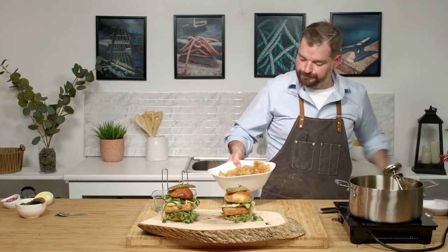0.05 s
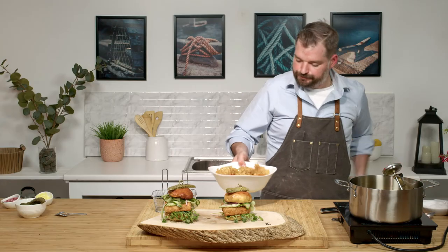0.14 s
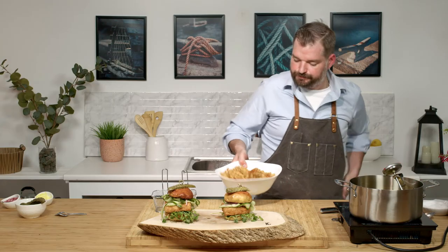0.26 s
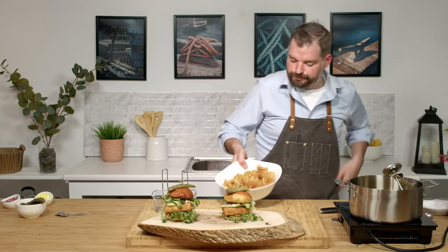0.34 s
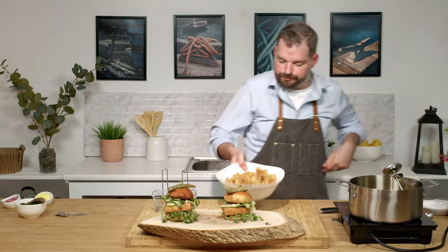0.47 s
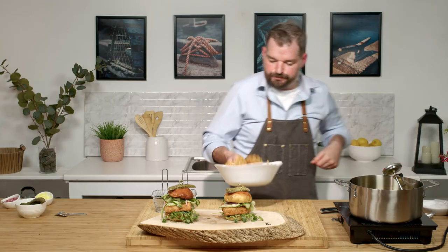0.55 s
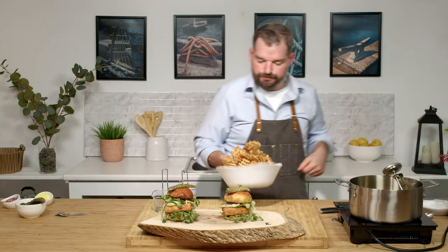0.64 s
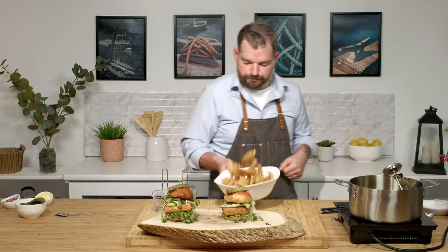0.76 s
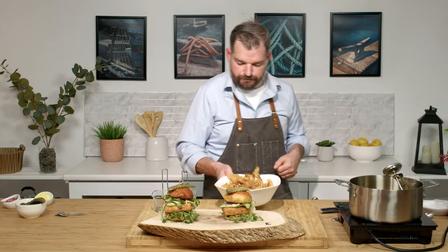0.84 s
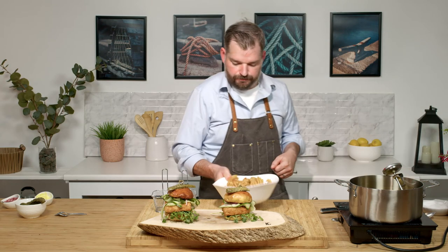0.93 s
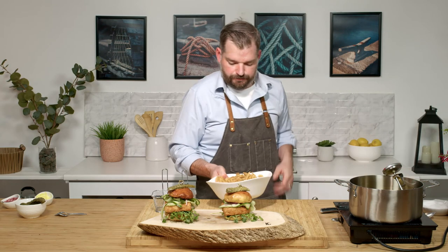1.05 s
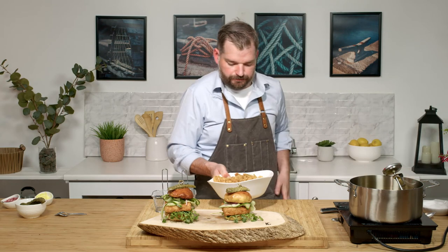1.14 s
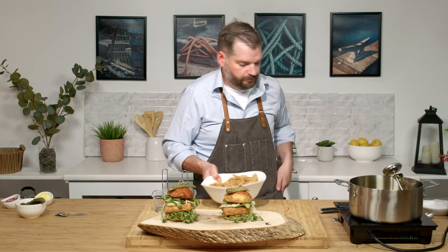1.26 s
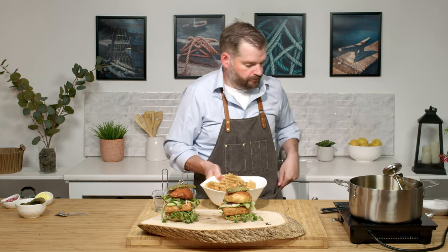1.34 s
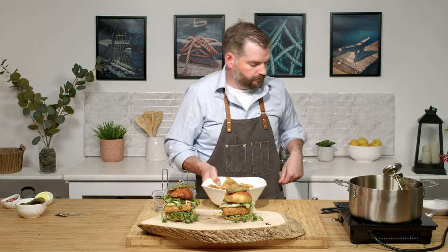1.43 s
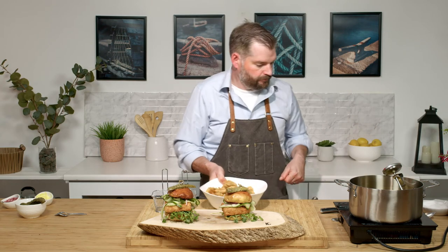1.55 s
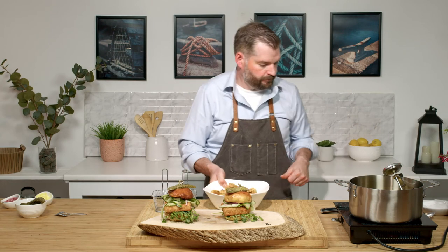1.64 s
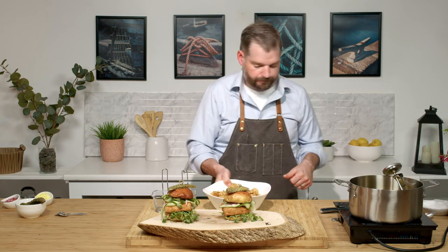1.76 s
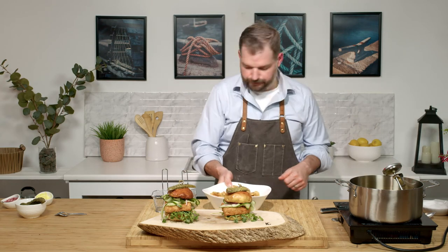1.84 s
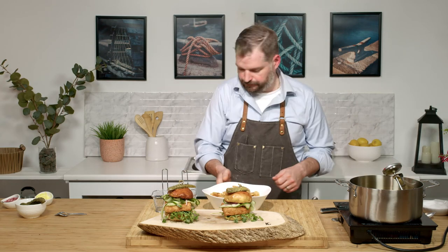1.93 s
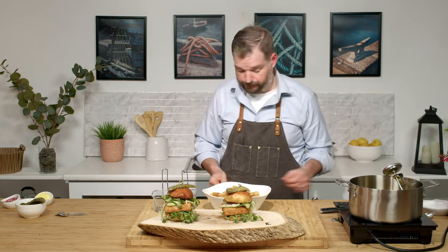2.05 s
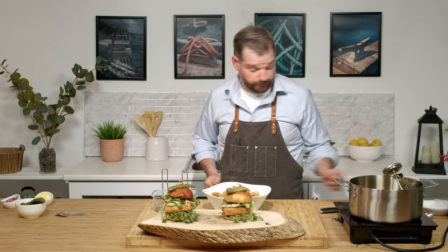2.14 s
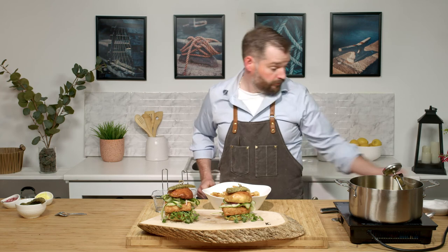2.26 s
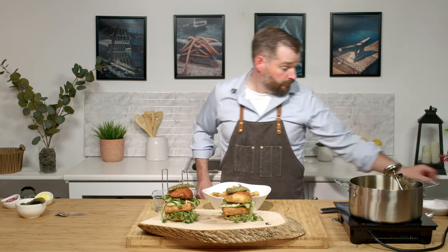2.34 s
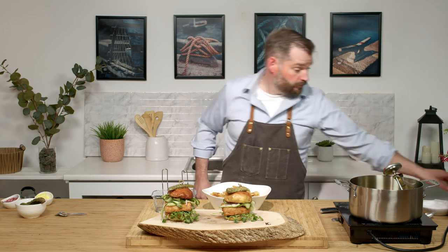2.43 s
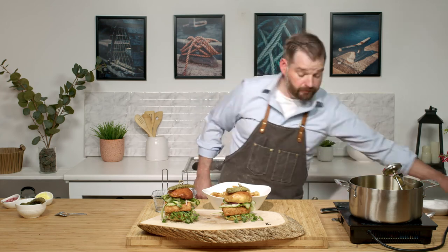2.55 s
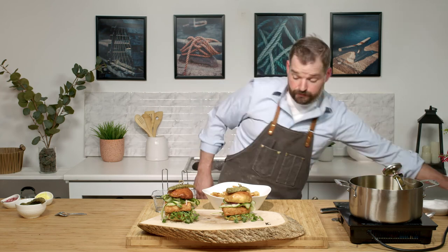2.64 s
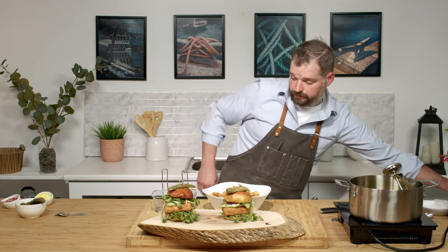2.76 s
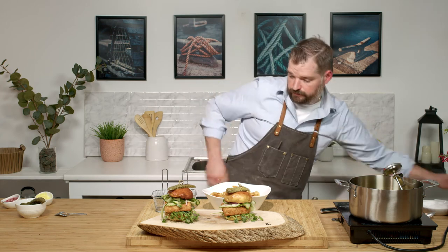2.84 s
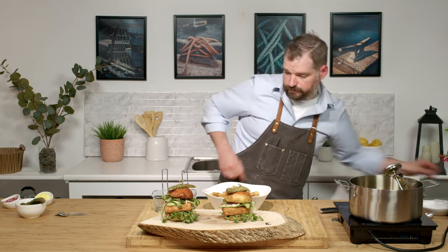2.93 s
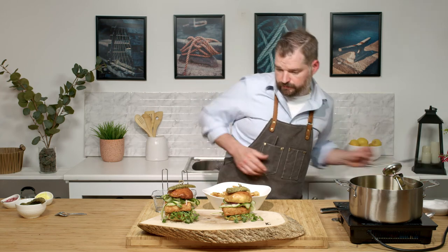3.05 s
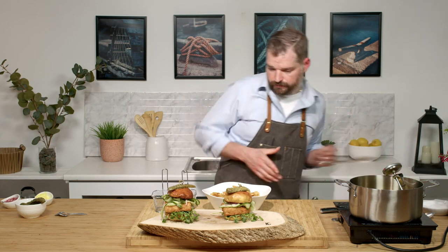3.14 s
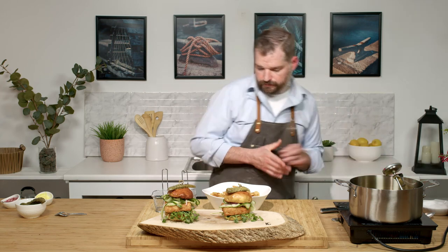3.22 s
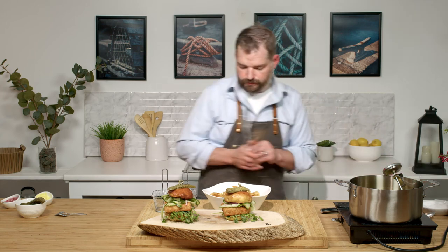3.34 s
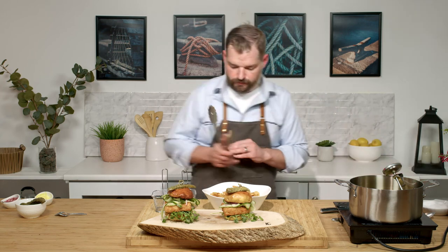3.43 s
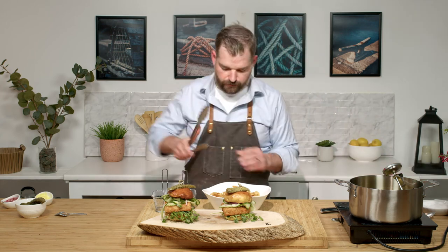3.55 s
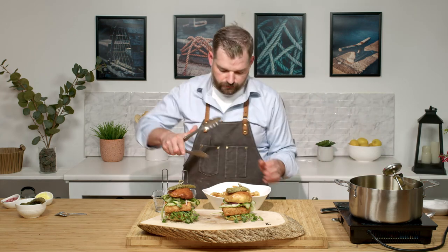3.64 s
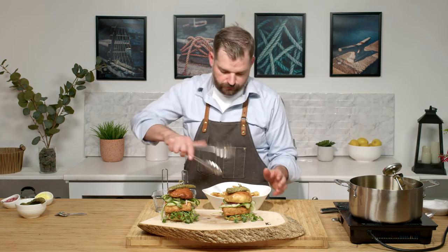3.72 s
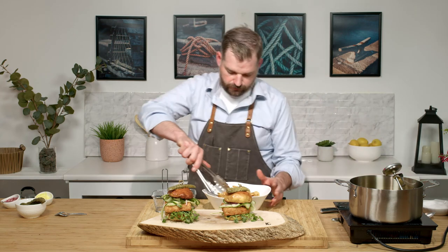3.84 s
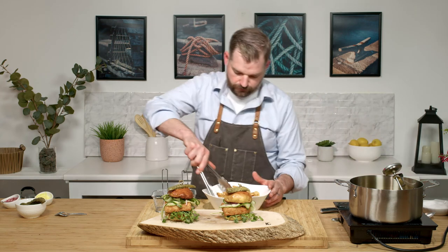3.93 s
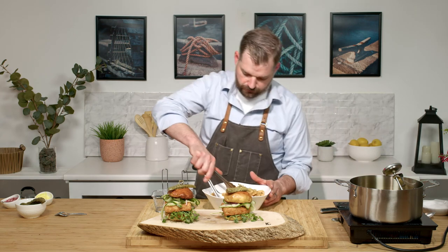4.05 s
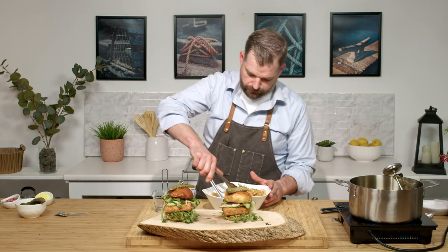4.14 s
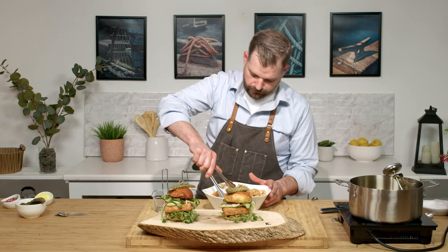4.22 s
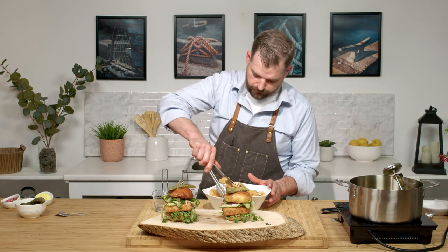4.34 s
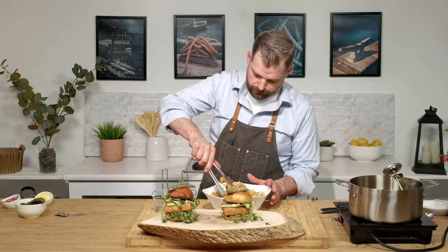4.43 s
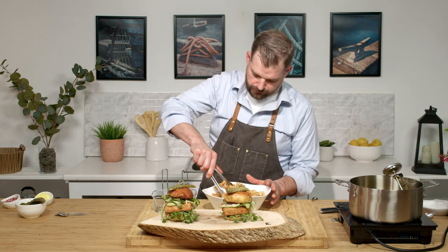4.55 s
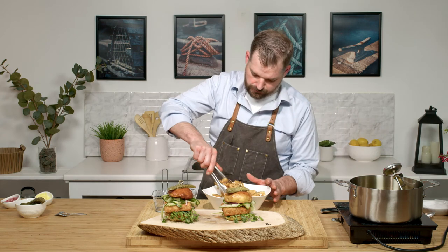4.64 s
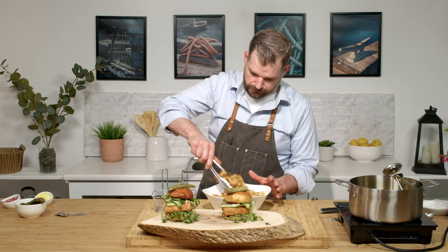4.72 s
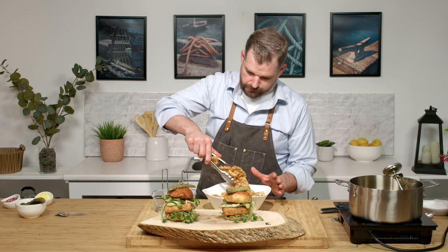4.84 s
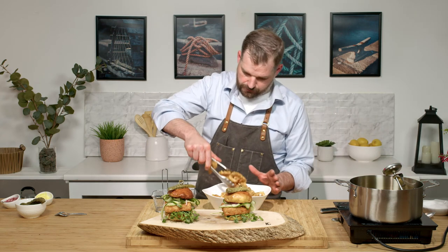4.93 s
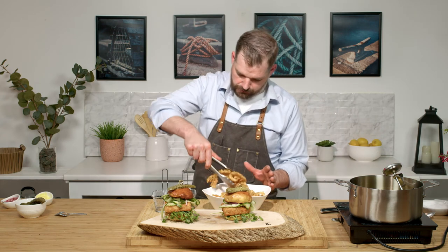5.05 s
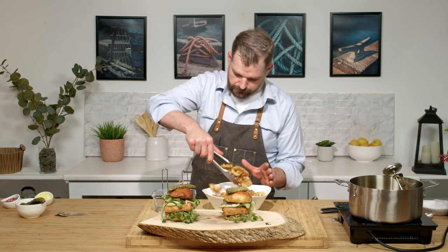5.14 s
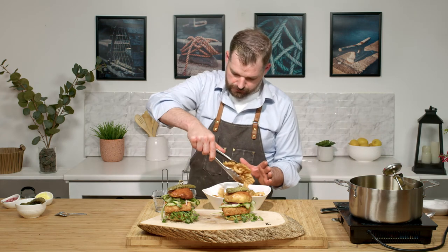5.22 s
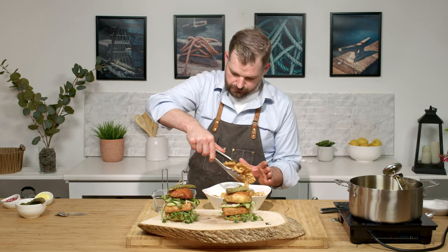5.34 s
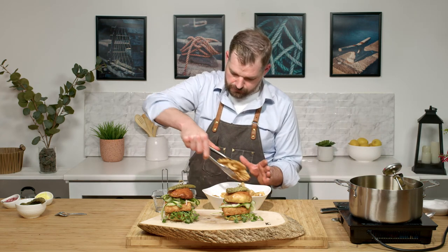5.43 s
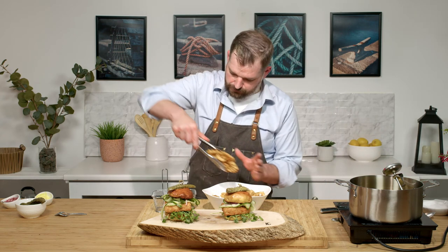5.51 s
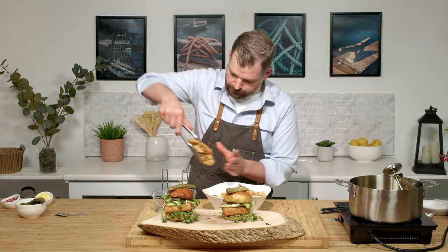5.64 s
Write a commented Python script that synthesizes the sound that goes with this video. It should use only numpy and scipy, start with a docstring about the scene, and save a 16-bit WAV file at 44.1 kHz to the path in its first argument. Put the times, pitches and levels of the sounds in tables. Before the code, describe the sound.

Near microphone in a small, lightly reverberant kitchen with faint room tone: shirt and apron rustle, a bowl is tapped, fries jump and land with small crunchy clicks. Around two seconds the bowl knocks loudly on wood. Metal tongs jingle as they are picked up, strike the bowl with a bright ringing clash, then scrape and tick, ending with a rim ping and quiet.

```python
"""In a quiet kitchen, with room tone that sinks slowly, a cook taps a ceramic bowl and tosses fries in it.
He sets the bowl on a wooden board, where it clatters to rest, then drags steel tongs off the counter.
The tongs clash on the bowl, scrape among the fries with small ticks, and leave a last ping on the rim.
His clothes rustle near the microphone throughout, dry, while bowl, board and tongs also wake the room.
Hard objects ring as damped modes; fries, scrapes and cloth are random tiny contacts, shaped in colour."""
import sys
import numpy as np
from scipy import signal
from scipy.fft import rfft, irfft, next_fast_len
from scipy.io import wavfile
from scipy.ndimage import map_coordinates

SR = 44100
rng = np.random.default_rng(int(sys.argv[2]) if len(sys.argv) > 2 else 0)


def to_wav(sig):
    """Store sig (one row per channel, or 1-D mono) as 16-bit WAV at the path in sys.argv[1].

    Samples outside -1..1 are clipped; the rate is SR.
    """
    pcm = np.clip(np.atleast_2d(sig), -1, 1) * 32767
    pcm = np.round(pcm).astype(np.int16)
    wavfile.write(sys.argv[1], SR, pcm.T)  # frames by channels


N = 250488
TIME = np.arange(N) / SR  # seconds through the scene
AGE = np.arange(SR // 2) / SR  # seconds since one blow

# In every table level_db is a setting ahead of the mix. A gesture is full from full_s for hold_s;
# its rise_s and fall_s are the times for a tenfold change.

# Room tone, spectrum: pitch_hz, level_db
ROOM_TONE = [(12, -50.5), (20, 7.5), (141, 0.5), (240, -0.5), (308, -0.5), (554, -2), (733, -5.5),
             (1510, -10.5), (1840, -11), (2300, -15), (3130, -22), (4140, -19.5), (15800, -32)]
AIR_DB, AIR_DB_PER_S = -66.5, -0.41  # level at the start, and its slow sinking
# Decay of the room's answer: pitch_hz, t60_s
KITCHEN_DECAY = [(150, 0.17), (700, 0.34), (3000, 0.59), (12000, 0.15)]
TOP_HZ = 15750  # band limit of the scene

# Hiss of sliding shirt and tumbling fries, spectrum: pitch_hz, level_db
SWISH_COLOUR = [(500, -6), (1000, -9), (1500, -6.5), (4000, -10.5), (10000, -14.5), (14000, -20),
                (15800, -33)]
# Low rustle of the crumpling apron, spectrum: pitch_hz, level_db
APRON_COLOUR = [(20, -17), (45, 3), (110, 2), (220, -3), (550, -9), (1500, -19), (2600, -18.5), (5400, -41),
                (10000, -55)]
# Arm movements: full_s, hold_s, shirt_db, apron_db
ARM_MOVES = [(0.065, 0.15, -61.5, -79), (0.222, 0.08, -96, -60), (0.39, 0.047, -66, -87),
             (0.63, 0.091, -72.5, -73), (0.813, 0.058, -57, -63), (0.983, 0.0091, -67, -58.5),
             (1.188, 0.32, -67, -67), (2.068, 0.064, -64.5, -54), (2.258, 0.08, -73, -64),
             (2.538, 0.045, -63.5, -65), (2.708, 0.039, -64, -55), (2.821, 0.072, -84, -61),
             (3.034, 0.021, -61.5, -55.5), (3.24, 0.11, -74.5, -62.5), (3.583, 0.059, -71, -65),
             (4.124, 0.26, -73.5, -73.5)]
MOVE_RISE_S, MOVE_FALL_S = 0.041, 0.044  # every movement starts and dies away alike
STIR_SHIRT_DB, STIR_APRON_DB, STIR_SWING_DB = -71, -75.5, 1.5  # the cloth is never quite still

# Soft bumps of hands, bowl and board, some under the tongs' blows: start_s, level_db, pitch_hz, t60_s
SOFT_BUMPS = [(0.289, -52.5, 635, 0.14), (0.85, -57, 200, 0.11), (0.998, -60, 130, .08),
              (1.215, -55, 50.3, 0.2), (2.113, -54.5, 96, 1), (2.828, -55, 610, 0.4),
              (2.872, -65, 600, 0.18), (3.9023, -43.5, 900, 0.015), (3.901, -45.5, 40, 0.093),
              (4.138, -57, 940, 0.098), (4.429, -51.5, 27.7, 0.17)]

# Modes of the bowl's floor, loaded with fries: pitch_hz, level_db, t60_s
BOWL_FLOOR = [(1847, 3.5, 0.094), (1940, -9.5, 0.032), (2037, -3.5, 0.084), (2900, -9.5, 0.029),
              (3240, 0.5, 0.059), (3445, -7.5, 0.0117), (5330, -12, 0.056), (5650, -3, 0.032),
              (6125, -9, 0.046), (6310, -7, 0.044), (7210, -9, 0.026), (8260, -28, 0.028)]
# Single fries landing, and other small blows that ring the bowl's floor: start_s, level_db, centre_hz
FLOOR_BLOWS = [(0.2454, -48, 3100), (0.392, -49, 4630), (0.433, -50.5, 4540), (0.7426, -43, 1750),
               (0.758, -49, 5500), (0.777, -42.5, 5800), (0.783, -49.5, 2000), (0.801, -46, 5440),
               (0.8172, -34.5, 3300), (0.824, -51.5, 1900), (0.829, -41, 3400), (0.838, -53, 7500),
               (0.856, -56, 2300), (0.925, -59, 3900), (0.981, -56, 3180), (1.215, -62, 1290),
               (1.345, -51, 3350), (1.365, -47, 3400), (1.38, -57.5, 1690), (1.477, -56.5, 5200),
               (1.586, -64, 1410), (1.641, -52, 2570), (1.742, -50.5, 2500), (1.793, -54, 3600),
               (1.936, -45.5, 2920), (4.141, -55, 3300)]
# Shakes and tosses that tumble the fries: full_s, level_db, rise_s, hold_s, fall_s
TOSS_GESTURES = [(0.24, -72.5, 0.059, 0.1, 0.04), (0.385, -64.5, 0.0091, 0.035, 0.04),
                 (0.755, -57.5, 0.029, 0.066, 0.035), (1.35, -75, 0.028, 0.03, 0.049)]
# The bowl being carried: full_s, rise_s, hold_s, fall_s
CARRY_GESTURE = (.6, .1, .95, .35)
SHIFT_DB, SHIFT_SWING_DB = -78, 2  # fries shift while carried: level and unevenness
DROPS_PER_S, DROP_HZ, DROP_DB = 60, 3360, -4.5  # lighter fries on each part of the bowl

# Modes of bowl and board together: pitch_hz, level_db, t60_s
BOWL_ON_BOARD = [(201, -4.5, .35), (258, -5, 0.28), (310, -6.5, 0.17), (386.6, -2.5, 0.23), (511, -5.5, .2),
                 (619, 1.5, 0.17), (692, -2.5, .25), (763, -0.5, 0.21), (858, -7.5, 0.18), (934, -8, 0.3),
                 (1041, -8.5, 0.28), (1156, -8.5, 0.23), (1338, -9.5, 0.091), (1904, -16.5, 0.049)]
# Dull knocks of bowl and board, as the foot lands and once when the tongs strike:
# start_s, level_db, centre_hz
BOARD_KNOCKS = [(1.741, -41.5, 159), (1.791, -36.5, 388), (1.821, -44, 260), (1.846, -39, 332),
                (1.873, -46, 180), (1.899, -36, 370), (1.914, -36, 397), (1.934, -19.5, 700),
                (1.9385, -24.5, 1600), (1.938, -29.5, 218), (1.9425, -15, 640), (1.950, -23.5, 545),
                (1.9595, -29, 480), (1.964, -33, 800), (1.9705, -18.5, 724), (1.987, -38, 555),
                (1.9955, -31, 920), (2.003, -31, 517), (2.0115, -28, 750), (2.0205, -38.5, 1080),
                (2.026, -37, 483), (2.039, -31.5, 900), (2.0485, -39, 750), (2.0615, -39, 750),
                (2.085, -39.5, 900), (2.107, -43, 1000), (2.122, -47.5, 850), (4.139, -49, 1800)]
# Bursts of chatter as its edge touches and as it lands: full_s, board_db, rim_db, rise_s, fall_s
FOOT_LANDINGS = [(1.795, -48.5, -69, 0.021, 0.29), (1.944, -45, -35, 0.033, 0.11)]
# Chatter of the bowl's edge, spectrum: pitch_hz, level_db
EDGE_COLOUR = [(240, -16), (400, -2.5), (462, -31), (502, -11.5), (636, -6), (698, 6), (759, 8), (860, -4),
               (940, -10), (1040, -32), (1170, -14), (1320, -11), (1520, -36), (2200, -30), (4000, -39.5),
               (8000, -66)]
# Thud of the board, spectrum: pitch_hz, level_db
BOARD_COLOUR = [(50, -23), (100, -4.5), (200, 0), (320, 6.5), (380, -25), (460, -11.5), (600, -13),
                (800, -20), (1300, -61)]
KNOCK_SHIFT, LOAD_SHIFT = 0.0205, 0.0086  # moving contact and load detune each blow (share of pitch)
KNOCK_LOW_HZ = 157.4  # the board radiates little below this
KNOCK_T60_S, KNOCK_RING_DB = 0.029, -20.5  # most of a knock stops at once; the rest rings on

# Modes of the tongs lying down: pitch_hz, width_hz, level_db (further weighted by width)
LYING_TONGS = [(2225, 35, -2), (2850, 28, -5), (3150, 35, -8), (3560, 32, -3), (3690, 16, -1),
               (4780, 35, -8), (5020, 28, -3), (5465, 20, 2), (5780, 25, -5), (6525, 22, 0), (8270, 35, -4),
               (8560, 25, -2), (8920, 40, -5), (9210, 25, -3), (10310, 14, 1), (12880, 40, -13),
               (14200, 50, -15)]
# Pulls that slide the tongs off the counter: full_s, level_db, rise_s, hold_s, fall_s
TONG_PULLS = [(2.8, -50.5, 0.016, 0.0053, 0.025), (2.868, -49, 0.019, 0.0044, 0.046)]
# Catches as they slide: start_s, level_db
TONG_CATCHES = [(2.794, -42.5), (2.803, -37.5), (2.812, -45), (2.828, -40.5), (2.837, -47), (2.849, -38),
                (2.856, -42), (2.862, -44), (2.869, -36), (2.874, -35.5), (2.881, -36)]
JINGLE_HZ, JINGLE_T60_S, JINGLE_DB = (2056, 9920), 0.037, -10  # other short partials of each catch
# Clatter of the sliding tongs, spectrum: pitch_hz, level_db
CLATTER_COLOUR = [(1400, -22), (2000, 2.0), (3700, 7.0), (4400, 0.0), (5500, 9), (7300, 4),
                  (9000, 7.5), (15000, -5.5)]

# Strokes of the tips through the fries: full_s, level_db, rise_s, hold_s, fall_s
DIG_STROKES = [(4.07, -67, 0.17, 0.11, 0.037), (4.195, -71.5, .015, .025, 0.06),
               (4.255, -61, 0.0099, 0.011, 0.03), (4.555, -58.5, 0.031, 0.014, 0.055),
               (4.665, -69, 0.027, 0.018, 0.069)]
# Sharp little touches on the bowl, damped by the fries: start_s, level_db, centre_hz
BOWL_TICKS = [(0.476, -51, 3900), (1.720, -44.5, 11500), (3.026, -51, 2800), (3.918, -29.5, 9000),
              (3.995, -40, 7500), (4.030, -46, 8500), (4.066, -44, 10500), (4.087, -41, 6000),
              (4.093, -37, 6140), (4.125, -49, 4500), (4.130, -42, 6950), (4.139, -29, 9600),
              (4.193, -43.5, 4500), (4.211, -50, 5040), (4.252, -45, 6060), (4.265, -52, 6000),
              (4.275, -52, 5000), (4.297, -49, 5700), (4.426, -43, 9750), (4.4312, -33.5, 10100),
              (4.434, -37.5, 7400), (4.556, -56, 7580), (4.572, -35, 6550), (4.569, -34, 9600),
              (4.599, -43, 10600), (4.6554, -36.5, 9200), (4.69, -49, 11500), (4.735, -51, 4500),
              (4.928, -36, 5900), (5.184, -61, 8540), (5.255, -56.5, 5470)]
# Scrape of the tips, spectrum: pitch_hz, level_db
SCRAPE_COLOUR = [(500, 10), (2000, 3.0), (6000, 3.0), (11000, 4.0), (15800, -15.0)]

# Light taps on the rim: start_s, level_db, centre_hz, damping_t60_s
RIM_TAPS = [(0.0715, -4, 1790, 0.058), (0.383, -0.5, 1580, 0.094), (5.0939, -1, 3140, 0.54)]
DAMPING_AT_HZ = 2900  # where that damping holds; higher modes die sooner
# Modes of the bowl's rim: pitch_hz, t60_s, clash_db, tap_db
BOWL_RIM = [(316, .6, -54, -75), (766, .2, -66, -75), (1346, .45, -57, -62), (2063, .42, -56, -71),
            (2887, .4, -52, -49), (3799, .21, -40, -64), (4761, .18, -49, -59), (5660, .07, -56, -54),
            (5735, .09, -55, -49), (6072, .17, -52, -56), (7291, .22, -54, -62), (8450, .12, -52, -61),
            (9803, .2, -60, -69), (11283, .15, -58, -62)]
# Modes of the steel tips: pitch_hz, t60_s, buzz_db on the bowl, free_db ringing
TONG_TIPS = [(3530, .3, -60, -61), (4400, .26, -54, -58), (5590, .19, -53, -52), (6550, .24, -52, -49),
             (6750, .21, -42, -47), (7090, .3, -53, -56), (7730, .18, -52, -51), (8058, .27, -37, -45),
             (8525, .22, -30, -45), (8640, .2, -40, -49), (9208, .19, -50, -47), (9610, .22, -46, -53),
             (9790, .24, -41, -49), (9900, .2, -43, -50), (10250, .2, -38, -52), (10360, .33, -44, -53),
             (11083, .22, -43, -48), (11285, .24, -44, -47), (11760, .24, -50, -53), (12380, .28, -45, -57),
             (12640, .2, -53, -55), (12900, .2, -45, -54), (14230, .24, -56, -57), (14550, .25, -48, -61)]
# Crowd of weaker steel modes, spectrum: pitch_hz, level_db
STEEL_COLOUR = [(150, -30), (300, 10), (500, -28), (1600, -17), (2300, -9), (4400, -5), (5100, -1),
                (6600, 7.5), (7400, 0), (8500, 9.5), (8900, -4), (9800, 8), (10800, 6), (11300, 0.5),
                (15800, -6)]
CLASH_S = 3.9005  # the tongs land on the bowl
RATTLE_PER_S, RATTLE_SWING_DB = 110, 2.5  # and rattle unevenly afterwards


def amp(db):
    """Decibels to gain."""
    return 10 ** (np.asarray(db) / 20)


def unit(x):
    """x at rms 1."""
    return x / np.sqrt(np.mean(x ** 2) + 1e-20)


def crest(x):
    """x at peak 1."""
    return x / np.abs(x).max()


def along(points, hz):
    """Interpolate (pitch_hz, value) points on a log frequency axis."""
    f, v = np.transpose(points)
    return np.interp(np.log(hz + 1), np.log(f + 1), v)


def filtered(x, response):
    """x times a response of frequency."""
    size = next_fast_len(len(x) + SR // 4)
    gain = response(np.fft.rfftfreq(size, 1 / SR))
    return irfft(rfft(x, size) * gain, size)[:len(x)]


def coloured(x, spectrum):
    """x with a (pitch_hz, level_db) spectrum, at rms 1."""
    return unit(filtered(x, lambda hz: amp(along(spectrum, hz))))


def grains(rate, spread_db):
    """Random tiny contacts of uneven size, rate a second on average, at rms 1."""
    size_db = spread_db * np.clip(rng.standard_normal(N), -2, 2)
    hits = rng.random(N) < rate / SR
    return unit(hits * rng.choice([-1, 1], N) * amp(size_db))


def fade(t60):
    """An exponential decay by 60 dB in t60 seconds."""
    return amp(-60 * AGE / max(t60, 1e-3))


def hiss():
    """White noise as long as one blow."""
    return rng.standard_normal(len(AGE))


def favour(hz, centre_hz, octaves):
    """A contact drives the octaves round its centre best."""
    return np.exp(-.5 * (np.log2((hz + 1) / centre_hz) / octaves) ** 2)


def ring(modes, centre_hz, octaves, scatter, shift=0):
    """Damped modes at new strengths and, given a shift, new pitches for each blow, at peak 1."""
    total = np.zeros(len(AGE))
    for k, (hz, db, t60) in enumerate(modes):
        strength = amp(db) * np.exp(scatter * rng.standard_normal()) * favour(hz, centre_hz, octaves)
        pitch = hz * (1 + shift * rng.standard_normal())
        total += (-1) ** k * strength * fade(t60) * np.sin(2 * np.pi * pitch * AGE)
    return crest(total)


def partial(hz, t60):
    """One dying mode, begun at any phase."""
    return fade(t60) * np.sin(2 * np.pi * (hz * AGE + rng.random()))


def twins(hz, t60, split_hz, twin_db):
    """Tongs and bowl are not quite symmetric, so each mode is a beating pair."""
    twin_hz = hz + split_hz * rng.choice([-1, 1]) * (.5 + rng.random())
    return partial(hz, t60) + amp(twin_db) * partial(twin_hz, t60)


def add(track, s, sound):
    """Mix a sound into the track at s seconds."""
    part = track[round(s * SR):][:len(sound)]
    part += sound[:len(part)]


def through(force, body):
    """A force rings a body of unit energy."""
    return signal.fftconvolve(force, body / np.linalg.norm(body))[:N]


def swell(s, rise, hold, fall):
    """An envelope full from s for hold seconds; rise and fall are the times for a tenfold change."""
    early, late = np.maximum(s - TIME, 0), np.maximum(TIME - s - hold, 0)
    return 10 ** -np.minimum(early / rise + late / fall, 10)


def strokes(rows):
    """The summed envelope of (full_s, level_db, rise_s, hold_s, fall_s) gestures."""
    return sum(amp(db) * swell(s, rise, hold, fall) for s, db, rise, hold, fall in rows)


def wobble(rate):
    """A smooth random curve, rate knots a second."""
    return map_coordinates(rng.standard_normal(256), [TIME * rate], mode="wrap")


def room_tone():
    """Steady coloured noise of the quiet room, sinking slowly."""
    return amp(AIR_DB + AIR_DB_PER_S * TIME) * coloured(rng.standard_normal(N), ROOM_TONE)


def kitchen(x):
    """Each frequency of the room's answer dies at its own speed."""
    hz, t, z = signal.stft(hiss(), SR, nperseg=256)
    decay = amp(-60 * t / along(KITCHEN_DECAY, hz)[:, None])
    tail = signal.istft(z * decay, SR, nperseg=256)[1][:len(AGE)]
    return through(x, tail * (1 - fade(0.017)))


def clothes():
    """Fibres hiss as the shirt slides; folds of the apron crumple with a low rustle."""
    stir = amp(STIR_SWING_DB * wobble(6.8))
    sliding, folding = amp(STIR_SHIRT_DB) * stir, amp(STIR_APRON_DB) * stir
    for s, hold, shirt_db, apron_db in ARM_MOVES:
        move = swell(s, MOVE_RISE_S, hold, MOVE_FALL_S)
        sliding = np.hypot(sliding, amp(shirt_db) * move)
        folding = np.hypot(folding, amp(apron_db) * move)
    shirt = coloured(grains(9000, spread_db=3), SWISH_COLOUR)
    apron = coloured(grains(1100, spread_db=1.5), APRON_COLOUR)
    return amp(-3.5) * sliding * shirt + folding * apron


def bumps():
    """Dull pushes with one broad resonance, some under the tongs' blows."""
    out = np.zeros(N)
    for s, db, hz, t60 in SOFT_BUMPS:
        push = filtered(hiss(), lambda f: favour(f, hz, octaves=0.25))
        add(out, s, amp(db) * crest(push * fade(t60) * (1 - fade(0.0053))))
    return out


def fries():
    """Soft fries tumble, and they and other small blows ring the bowl's floor, damped by the load."""
    out = np.zeros(N)
    for s, db, hz in FLOOR_BLOWS:
        crunch = crest(filtered(hiss(), lambda f: favour(f, hz, octaves=0.92)) * fade(0.097))
        tone = ring(BOWL_FLOOR, hz, octaves=.45, scatter=.3, shift=LOAD_SHIFT)
        add(out, s, amp(db) * (tone + amp(-11) * crunch))
    carried = amp(SHIFT_DB + SHIFT_SWING_DB * wobble(5.93)) * swell(*CARRY_GESTURE)
    motion = strokes(TOSS_GESTURES) + carried
    tumble = coloured(grains(700, spread_db=9.5), SWISH_COLOUR) * motion
    drops = np.zeros(N)
    for place in range(4):  # each part of the bowl answers differently
        force = grains(DROPS_PER_S, spread_db=7.5) * motion
        drops += through(force, ring(BOWL_FLOOR, DROP_HZ, octaves=1.1, scatter=.4, shift=LOAD_SHIFT))
    return out + amp(DROP_DB) * drops + amp(-6) * tumble


def bowl_on_board():
    """Bowl and board knock dully and the foot chatters as it lands; soft contacts hold no treble."""
    out = np.zeros(N)
    held = (fade(KNOCK_T60_S) + amp(KNOCK_RING_DB)) * (1 - fade(0.012))
    for s, db, centre_hz in BOARD_KNOCKS:
        modes = np.zeros(len(AGE))
        for hz, level, t60 in BOWL_ON_BOARD:
            strength = amp(level + rng.normal(0, 1.5)) * favour(hz, centre_hz, octaves=0.88)
            pitch = hz * (1 + KNOCK_SHIFT * rng.standard_normal())
            modes += strength * fade(t60) * np.sin(2 * np.pi * pitch * AGE)
        band_hz = [KNOCK_LOW_HZ, KNOCK_LOW_HZ + 1.6 * centre_hz]
        contact = signal.butter(4, band_hz, "band", fs=SR, output="sos")
        add(out, s, amp(db) * crest(signal.sosfilt(contact, modes * held)))
    board = coloured(grains(1500, spread_db=1), BOARD_COLOUR)
    edge = coloured(grains(2500, spread_db=1), EDGE_COLOUR)
    for s, board_db, rim_db, rise, fall in FOOT_LANDINGS:
        out += swell(s, rise, 0, fall) * (amp(board_db) * board + amp(rim_db) * edge)
    return out


def pick_up():
    """The tongs rasp over the counter and ring on after each catch; every catch clatters differently."""
    body = np.zeros(len(AGE))
    for hz, width, db in LYING_TONGS:
        tone = np.sin(2 * np.pi * (hz * AGE + rng.random()))
        body += amp(db) * width * np.exp(-np.pi * abs(width) * AGE) * tone  # a wider mode dies sooner
    pull, jingles = strokes(TONG_PULLS), np.zeros(N)
    force = amp(-1.0) * pull * grains(700, spread_db=10.0)
    clatter = amp(-7.0) * pull * grains(3900, spread_db=9.0)
    for s, db in TONG_CATCHES:
        add(force, s, [amp(db + 5.5)])
        pitches = np.geomspace(*JINGLE_HZ, num=16) * np.exp(rng.normal(0, .05, 16))
        jingle = sum(amp(rng.normal(0, 4)) * partial(hz, JINGLE_T60_S) for hz in pitches)
        add(jingles, s, amp(db + JINGLE_DB) * crest(jingle))
        add(clatter, s, amp(db - 14.0) * hiss() * (fade(0.012) + amp(-19.0) * fade(0.47)))
    rattle = filtered(clatter, lambda hz: amp(along(CLATTER_COLOUR, hz)))
    return through(force, body) + jingles + rattle


def ticks_and_scrapes():
    """Sharp little touches tick on the bowl; later the tips scrape and squeak among the fries."""
    scrape = coloured(grains(2200, spread_db=5.5), SCRAPE_COLOUR)
    # each tiny slip rings for a moment
    out = through(strokes(DIG_STROKES) * scrape, hiss() * fade(0.0036))
    for s, db, hz in BOWL_TICKS:
        # a narrow colour of its own over a broad, weaker one
        crack = filtered(hiss(), lambda f: favour(f, hz, octaves=.45) + amp(-8) * favour(f, 2500, octaves=1.4))
        crack = crack * (fade(.01) + amp(-24) * fade(.06))
        dish = ring(BOWL_FLOOR, hz, octaves=.8, scatter=.5)
        add(out, s, amp(db - 5.5) * (crest(crack) + amp(-18.5) * dish))
    squeak = unit(filtered(grains(650, spread_db=4.0), lambda f: favour(f, 2030, octaves=0.11)))
    moment = np.exp(-.5 * ((TIME - 4.545) / 0.013) ** 2)
    return out + amp(-61.5) * squeak * moment


def taps():
    """Light taps ping the rim; the hand and the fries damp its high modes most."""
    out = np.zeros(N)
    for s, db, centre_hz, damping in RIM_TAPS:
        tone = np.zeros(len(AGE))
        for hz, t60, _, level in BOWL_RIM:
            pair = twins(hz, t60, split_hz=45, twin_db=-54) * fade(damping * DAMPING_AT_HZ / hz)
            tone += amp(level) * favour(hz, centre_hz, octaves=1.86) * pair
        click = coloured(hiss(), STEEL_COLOUR) * fade(0.035)
        add(out, s, amp(db) * (tone + amp(-60) * click) * (1 - fade(.0025)))
    return out


def clash():
    """The tips buzz on the bowl for a few milliseconds, then steel and rim ring on with a fine rattle."""
    out = np.zeros(N)
    buzz = np.exp(-((AGE - .0066) / .004) ** 2)
    forced = sum(amp(db) * partial(hz, 0.66) for hz, _, db, _ in TONG_TIPS)
    tips = sum(amp(db) * twins(hz, t60, split_hz=42, twin_db=-15) for hz, t60, _, db in TONG_TIPS)
    rim = sum(amp(db) * twins(hz, t60, split_hz=25.8, twin_db=-5.0) for hz, t60, db, _ in BOWL_RIM)
    shake = amp(RATTLE_SWING_DB * wobble(RATTLE_PER_S)[:len(AGE)])
    rattle = shake * (amp(-44.0) * fade(0.24) + amp(-46.0) * fade(0.49))
    contacts = grains(3500, spread_db=2)[:len(AGE)]
    crowd = coloured(contacts, STEEL_COLOUR) * (amp(-33.5) * buzz + rattle)
    blow = amp(6.5) * forced * buzz + amp(6.0) * tips + amp(-1.8) * rim + crowd
    add(out, CLASH_S, blow * (1 - fade(0.039)))
    return out


def scene():
    """All sources over the room tone; wood and bright sounds also wake the room, cloth and bumps stay dry."""
    wood = bowl_on_board()
    bright = fries() + pick_up() + clash() + taps() + ticks_and_scrapes()
    answer = kitchen(amp(-13.0) * wood + amp(-25.5) * bright)
    return (wood + bright + answer + bumps() + clothes() + room_tone())[None]


def record(dry):
    """Nothing is kept above the band limit."""
    return filtered(dry[0], lambda hz: hz < TOP_HZ)[None]


dry = scene()
out = record(dry)
to_wav(out)
```